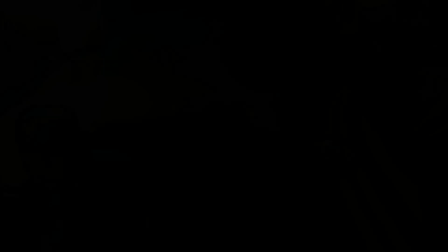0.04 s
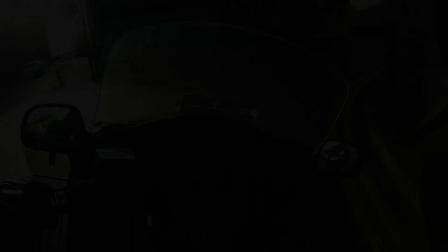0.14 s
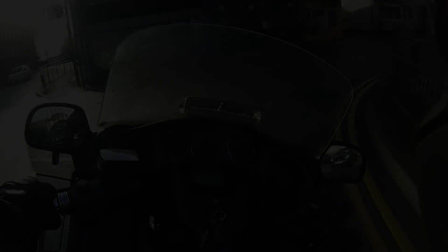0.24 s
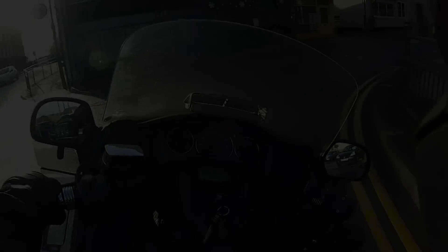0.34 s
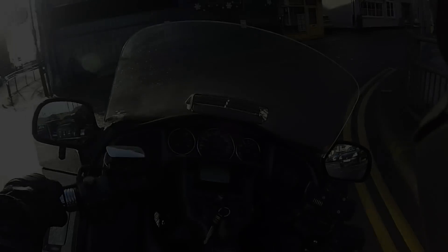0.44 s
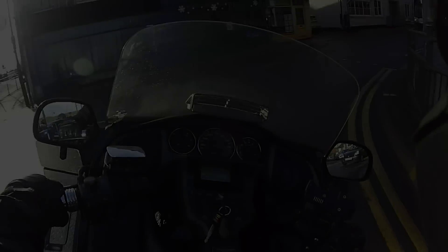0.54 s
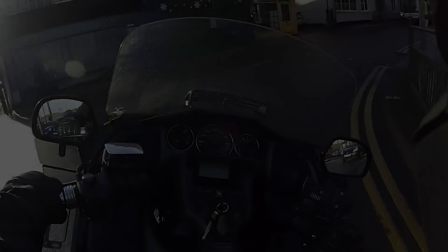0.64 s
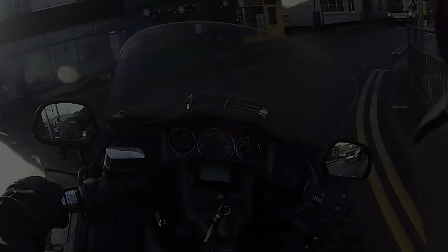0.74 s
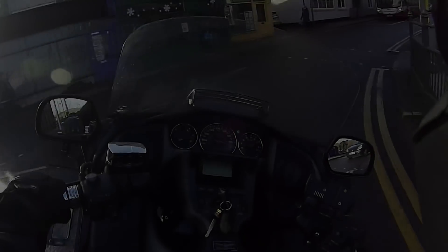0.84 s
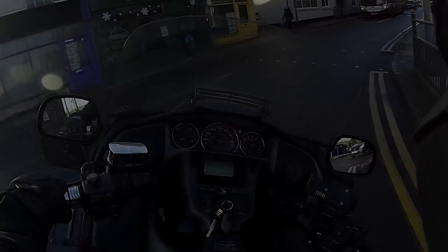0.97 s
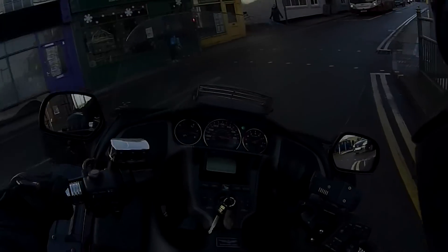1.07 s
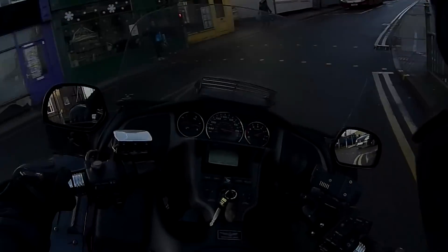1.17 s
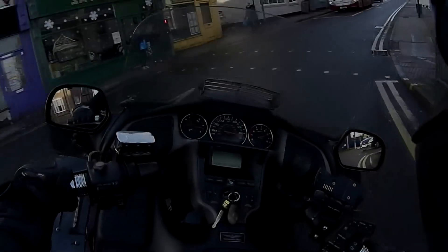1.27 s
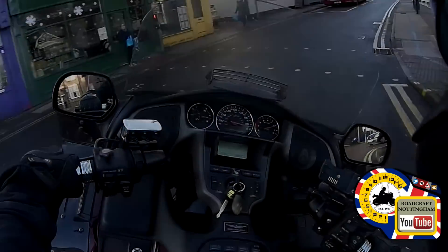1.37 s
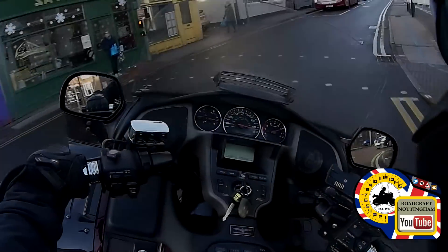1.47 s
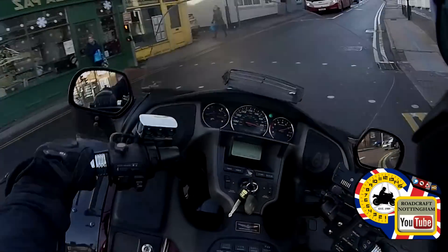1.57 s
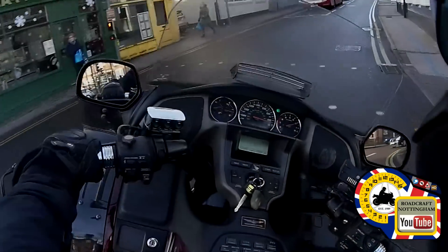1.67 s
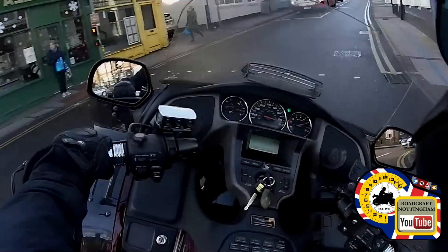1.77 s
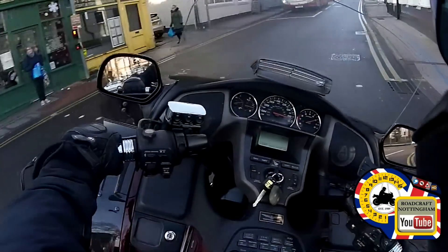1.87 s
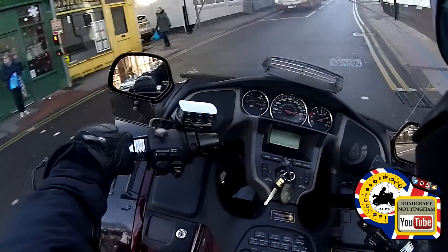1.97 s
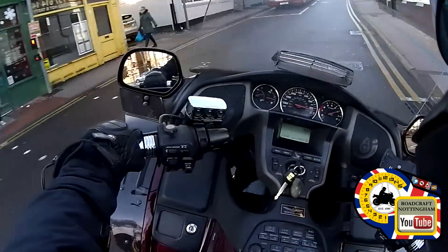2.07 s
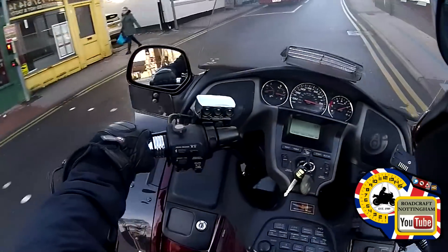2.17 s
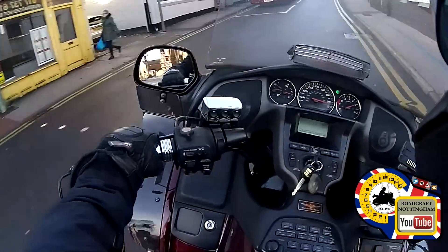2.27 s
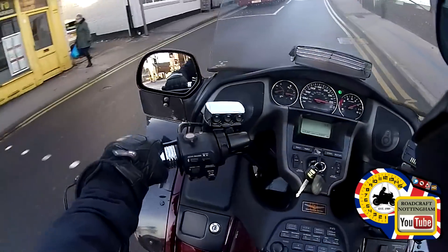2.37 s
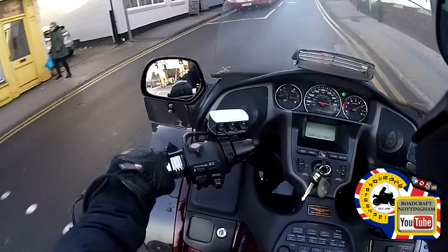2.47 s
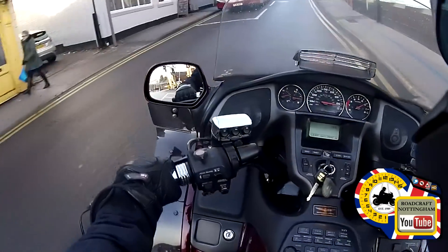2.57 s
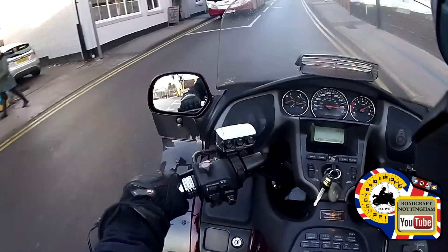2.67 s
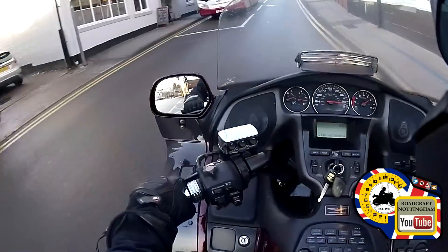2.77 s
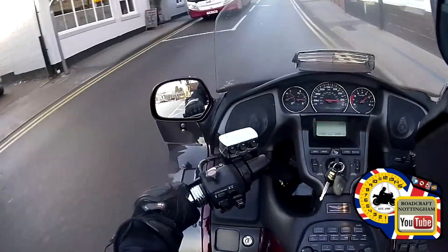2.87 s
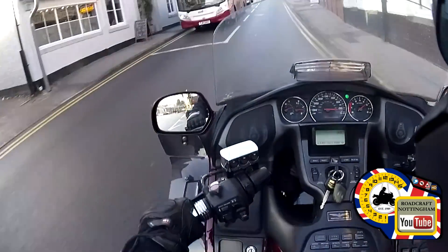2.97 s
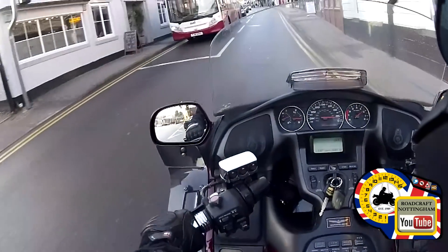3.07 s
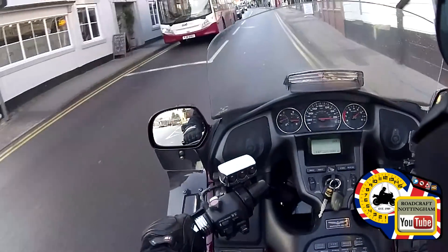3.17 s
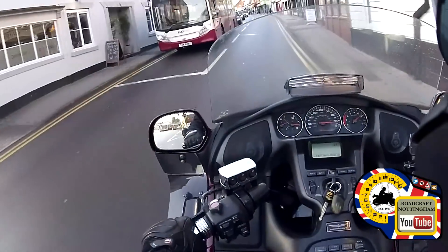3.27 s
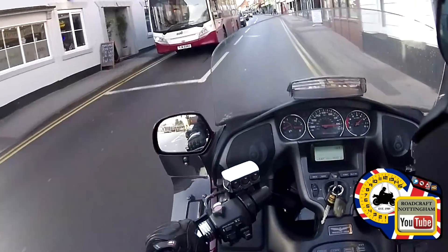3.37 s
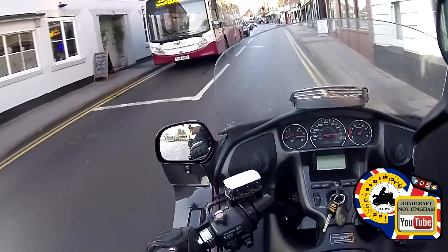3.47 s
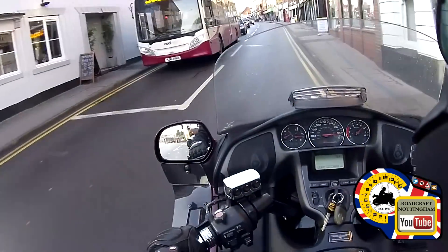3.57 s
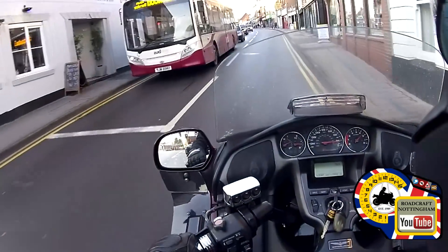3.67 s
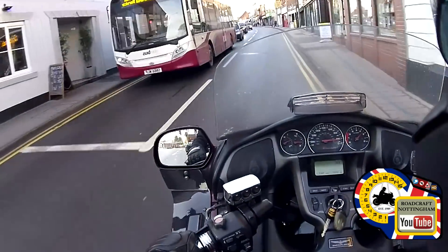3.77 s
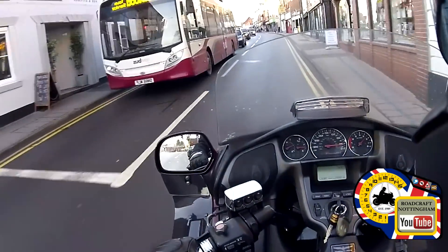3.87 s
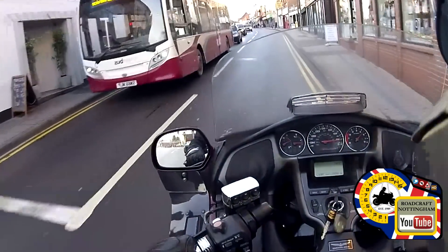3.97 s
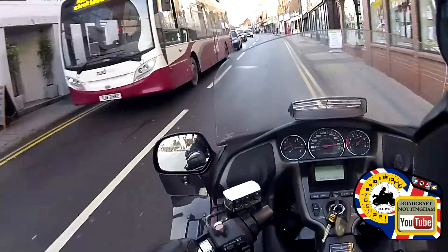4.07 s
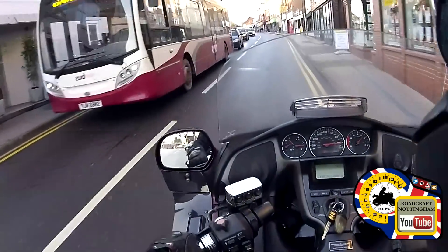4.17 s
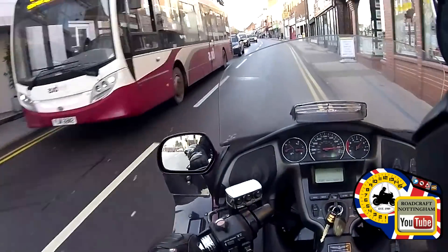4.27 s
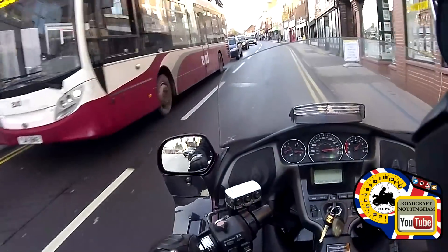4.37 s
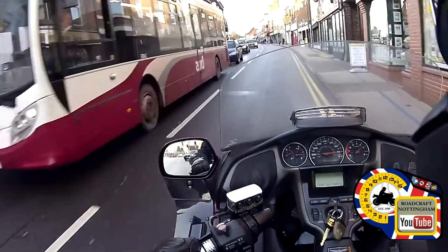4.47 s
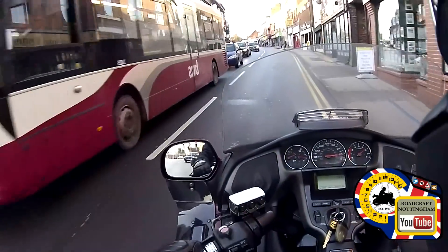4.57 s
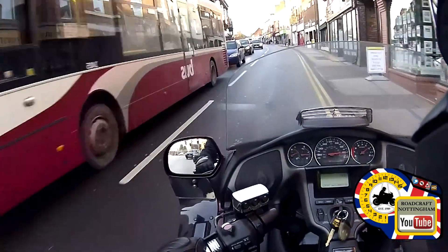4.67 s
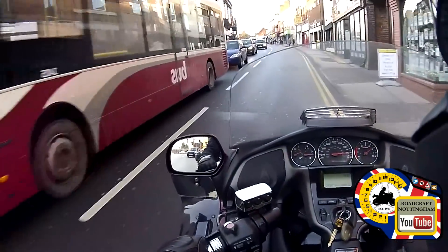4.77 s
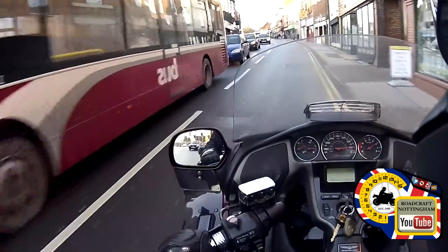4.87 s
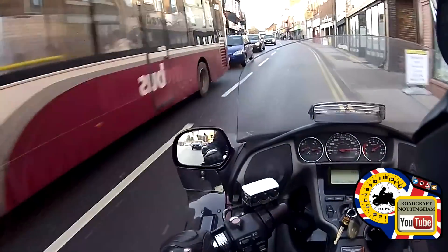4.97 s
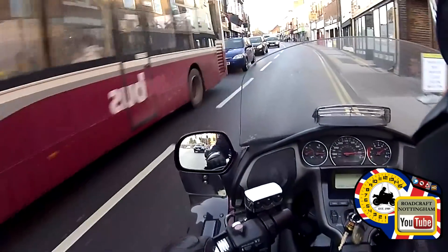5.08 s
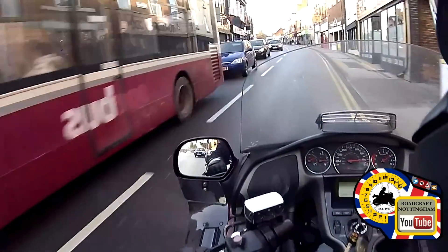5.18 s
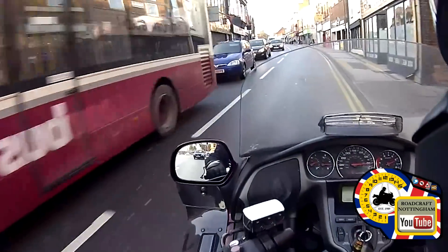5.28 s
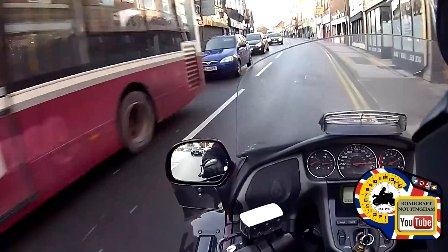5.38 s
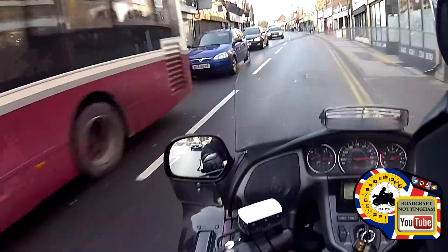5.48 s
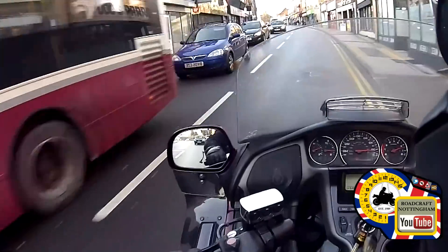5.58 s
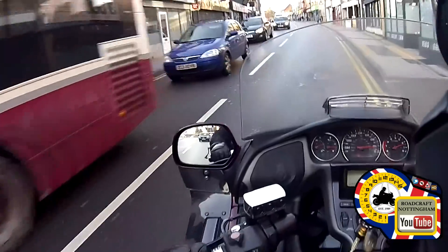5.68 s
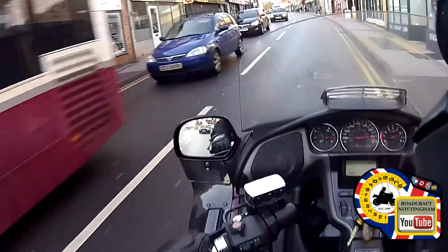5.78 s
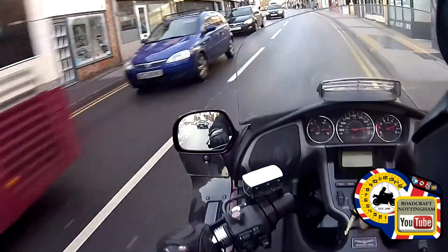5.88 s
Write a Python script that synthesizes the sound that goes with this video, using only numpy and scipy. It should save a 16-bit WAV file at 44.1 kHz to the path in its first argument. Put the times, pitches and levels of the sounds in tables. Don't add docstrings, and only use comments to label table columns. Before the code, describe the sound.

From the saddle, a deep multi-cylinder motorcycle hum climbs for four seconds amid tyre and wind roar, knocks through a shift, and settles lower.

```python
import sys
import numpy as np
from scipy import signal
from scipy.io import wavfile
from scipy.ndimage import uniform_filter1d

SR = 44100
rng = np.random.default_rng(int(sys.argv[2]) if len(sys.argv) > 2 else 0)


def gain_from_db(level_db):
    decades = np.asarray(level_db, float) / 20
    return 10 ** decades


def transcribe(signal):
    frames = np.atleast_2d(signal).T
    limited = np.clip(frames, -1, 1)
    pcm = np.round(limited * 32767).astype(np.int16)
    wavfile.write(sys.argv[1], SR, pcm)


N = 261424

# time in seconds, firings per second.
FIRING_RATE = [(0, 89.8), (.81, 90.2), (1.5, 96.5), (2.3, 106.7), (3.1, 119.4), (3.7, 128.4), (4.07, 134.2),
               (4.12, 125), (4.16, 121.5), (4.2, 113), (4.3, 101.5), (4.38, 98.3), (4.62, 101), (4.73, 100),
               (4.8, 95), (4.94, 78.5), (5.5, 78.8), (5.93, 80.1)]
# time in seconds, firing strength in dB, pulse sharpness as octave lift in dB.
FIRING_STRENGTH = [(0, -2, 0.95), (2.4, 2.2, -2.5), (2.6, 3.8, -1), (4.04, -1.34, 2.7), (4.08, -10.5, 12),
                   (4.17, 1.1, -2), (4.28, -4, -22), (4.32, -4, -13), (4.37, -12, 4), (4.6, -6.5, -1.1),
                   (4.68, -8.5, 3.5), (4.74, -6, 1), (4.92, -9, 1), (5.08, 0, -3), (5.3, -5, 5),
                   (5.65, -4.5, -0.5), (5.8, 0, -10), (5.93, -4.5, 0.1)]
# frequency in Hz, level in dB.
PIPE = [(79, -20.5), (90, -21.5), (101, -19), (116, -16), (134, -11.5), (158, -15.5), (195, -27),
        (230, -36.5)]
UNEVEN_ORDERS = [.75, 1.5, 2.5, 3.5, 4, 4.5, 5, 5.5, 6.5, 7, 7.5, 8.5, 9, 10.5, 11, 12, 13.5, 14, 15, 15.5,
                 16.5, 18.5]
UNEVEN_DB = [-46.5, -51, -47.5, -48.5, -30.5, -35.5, -37, -44.5, -49.5, -46.5, -44, -45, -44.5, -50, -53,
             -45.5, -50, -47.5, -56, -54.5, -49, -52.5]
# frequency in Hz, width in Hz, boost in dB.
FAIRING = [(256, 31, 5), (476.4, 38.7, 12), (690, 50, 3)]
# order per crank turn, level in dB.
MESH = [(73, -4), (74.2, 0), (75, -1), (76, -8)]
# order per crank turn, level in dB.
FLANKS = [(70.5, -4), (71, 0), (72, -4), (77, 0), (78, -3)]
# order per crank turn, level in dB.
MESH_OCTAVE = [(145, -5), (147.5, -5), (148.1, 0), (149.5, -5)]
# order per crank turn, level in dB.
CAMS = [(49, 0), (51, -5)]
# order per turn at road speed, level in dB.
GEARBOX = [(20.08, 1), (22.5, -8), (26.4, -12), (27.8, -9), (30.2, -11)]
# firings in Hz, then mesh, outer sidebands, cam drive, mesh octave in dB.
CASING = [(79, -60.5, -65.5, -69, -61.5), (87.5, -57, -56, -66.5, -64.5), (96.1, -55.5, -56, -61, -71.5),
          (100.7, -51.5, -60.5, -69.5, -73), (114, -56, -62, -63, -76.5), (112.7, -45, -67, -57.5, -78),
          (116.5, -61, -67, -59.5, -78), (131, -55.5, -65.5, -60.5, -78.5)]
# frequency in Hz, density in dB per Hz.
ROAR = [(12, -48), (20, -16.5), (59, -19), (85, -11), (106, -3.5), (135, -0.5), (172, -8.5), (225, -8),
        (365, -12.5), (500, -8), (811, -16), (1030, -24.5), (1850, -35), (2350, -34.5), (6500, -59.5),
        (8450, -95), (14300, -120)]
# frequency in Hz, density in dB per Hz.
HISS = [(1760, -30), (3000, 0), (4030, 0.5), (6370, -11.5), (9600, -3), (13100, -35.5), (13900, -50),
        (15000, -60)]
# frequency in Hz, correlation from 0 to 1.
LIKENESS = [(25, 0.99), (500, 0.995), (1400, .985), (2500, .965), (4500, .9), (7000, 0.9), (10000, .78),
            (12500, .02)]
# time in seconds, roar in dB, hiss in dB, half width in seconds.
PASSING = [
    (.4, 0.4, 1.9, .5),
    (1.3, -2.5, -0.2, 0.37),
    (1.95, 2, -1.9, 0.07),
    (3.75, -0.3, 0.8, .2),
    (4.65, 0, 1, .25),
    (5.4, 1.4, -3, 0.28),
]
# time in seconds, lift in dB, half width in seconds.
GUSTS = [
    (1.3, 4.5, .3),
    (1.9, 5.5, .25),
    (4.2, 5.5, 0.28),
    (5.4, 8, .25),
]
# frequency in Hz, level in dB.
WHISTLES = [(9625, -87.5)]
# time in seconds, peak in dB, scuff in dB, scuff length in seconds.
KNOCKS = [(1.533, -48, -56.5, .015), (1.947, -34.5, -48.5, 0.043), (2.456, -29, -43.5, 0.012),
          (2.564, -27, -45.5, 0.018), (2.587, -32, -52, .015), (3.429, -25, -50, 0.011),
          (4.091, -24.5, -45.5, 0.038), (4.227, -42, -56.5, .015), (4.291, -26.5, -57, 0.033),
          (4.430, -24.5, -44.5, 0.025), (4.438, -25, -50, 0.02), (4.446, -27.5, -51, 0.02),
          (4.598, -40, -56, 0.025), (4.762, -34, -44, .04), (4.887, -27, -50.5, 0.017)]
# frequency in Hz, level in dB, t60 in seconds.
PANEL = [(510, 0.5, 0.037), (530, 1, 0.1), (770, 1, .04), (960, -29, .04)]
# time in seconds, peak in dB, left over right in dB.
TICKS = [(2.3025, -49.5, 7.5), (2.3142, -51, 4.5), (2.5507, -47.5, 5), (2.5652, -47, 7),
         (2.7111, -47.5, 3.5), (2.7413, -45.5, 7), (2.842, -47, 4.5), (2.8864, -56, -3), (2.9813, -50, 1),
         (3.0988, -44, 2), (3.1324, -55.5, 8.5), (3.1311, -44, 0), (3.1491, -46.5, -1.5),
         (3.2232, -56, 1.5), (3.3462, -48.5, 6.5), (3.586, -43.5, -1.5), (3.7507, -48.5, 7.5),
         (3.7772, -52, 1), (3.787, -46.5, 8), (3.796, -44.5, 5), (3.8854, -53.5, 4), (3.9933, -52.5, 6.5),
         (4.165, -43, 5), (4.2884, -51, 5), (5.0774, -48.5, 0), (5.101, -51.5, 4.5), (5.2038, -49, 5)]
# time in seconds, peak in dB, frequency in Hz.
BUMPS = [
    (3.22, -23, 44.5),
    (4.09, -15, 104),
    (4.292, -14, 93.4),
    (4.334, -13.5, 131),
    (4.55, -38, 140),
    (5.701, -13.5, 117),
]
# start in seconds, end in seconds, level in dB, attack in seconds.
DRIVE = [
    (3.415, 4.155, -28.5, 0.28),
    (4.623, 4.975, -29.5, 0.21),
    (4.973, 5.99, -32, 0.036),
]
# time in seconds, level in dB, length in seconds.
CLUTCH_BITE = (4.765, -54.5, .045)

START_S, END_S, SHIFT_S = 0.037, 5.928, 4.07
COAST_SHARE = 0.976
SLIP_SHARE, SLIP_UNTIL_S = 0.125, 1.05
UNEVEN_BASE_DB, UNEVEN_FOLLOWS = -0.5, 0.46
ECHO_FROM_S, ECHO_BEAT_HZ_PER_S, ECHO_SHARE, ECHO_GROWS_S = 2.1, 3.076, 0.16, 0.73
BITE_MESH_DB, BITE_OCTAVE_DB, BITE_WHINE_S = 7.5, 13.5, 0.085
SLOWING_MESH_DB, SLOWING_OCTAVE_DB = -3.5, 7
OCTAVE_FOLLOWS = 1
GEARBOX_DB, GEARBOX_FADES_FROM, GEARBOX_FADE_DB = -41.5, 0.78, -87
ROAR_DB, ROAR_SPEED_POWER, ROAR_FOLLOWS = -29.5, 0.55, 0.32
HISS_DB, HISS_SPEED_POWER, BUFFET_DB = -60, 2.4, -43.5
SELF_NOISE_DB = -84
DRIVE_TOP_HZ, DRIVE_RELEASE_S = 819.7, 0.054


def in_time(rows):
    s, *columns = np.transpose(rows)
    return [np.interp(np.arange(N) / SR, s, column) for column in columns]


def at_hz(points, hz):
    table_hz, values = np.transpose(points)
    return np.interp(np.log(hz), np.log(table_hz), values)


def rms_one(x):
    return x / np.sqrt(np.mean(x ** 2) + 1e-20)


def band(x, order, low_hz, high_hz):
    return signal.sosfilt(signal.butter(order, [low_hz, high_hz], "band", fs=SR, output="sos"), x)


def drift(rate_hz, bend=lambda slow: slow):
    r = np.exp(-80 * np.pi * rate_hz / SR)
    white = rng.standard_normal(N // 40 + 2002)
    slow = signal.lfilter([1], [1, -2 * r, r * r], white)[2000:]
    return np.interp(np.arange(N) / 40, np.arange(len(slow)), bend(rms_one(slow)))


def swell(start_s, length_s):
    age = np.clip(np.arange(N) / SR - start_s, 0, 10 * length_s) / length_s * 3
    return age * np.exp(1 - age)


def hump(rows, column):
    t = np.arange(N) / SR
    return sum(row[column] * np.exp(-((t - row[0]) / row[-1]) ** 2) for row in rows)


def ring(x, hz, t60_s):
    r, w = gain_from_db(-60 / (t60_s * SR)), 2 * np.pi * hz / SR
    return signal.lfilter([0, np.sin(w)], [1, -2 * r * np.cos(w), r * r], x + 1e-18)


def lines(orders, turns, wander_db, rate_hz, blur_rad, boost=lambda order: 1):
    out = 0
    for order, level_db in orders:
        phase = 2 * np.pi * (order * turns + rng.random()) + blur_rad * drift(rate_hz)
        gain = drift(rate_hz, lambda slow: gain_from_db(level_db + wander_db * slow))
        out = out + boost(order) * gain * np.sin(phase)
    return np.sqrt(2) * out


def banded_noise(spectrum, low_hz, count, shared_db, patchy_db):
    out, edges_hz = 0, low_hz * 2 ** (np.arange(count + 1) / 3)
    white = rng.standard_normal((2, 2, N))
    for k, (low, high) in enumerate(zip(edges_hz, edges_hz[1:])):
        mid, side = band(white[k % 2], 2, low, high)
        hz = np.sqrt(low * high)
        alike = np.clip(at_hz(LIKENESS, hz), 0, 1)
        gain = drift(13, lambda slow: gain_from_db(at_hz(spectrum, hz) + patchy_db * slow))
        out = out + gain * (np.sqrt(1 + alike) * mid + np.sqrt(1 - alike) * side * [[1], [-1]])
    return rms_one(out * gain_from_db(shared_db))


def echo_beat():
    t = np.arange(N) / SR
    age = np.clip(t - ECHO_FROM_S, 0, None)
    share = ECHO_SHARE * np.clip(age / ECHO_GROWS_S, 0, 1) * (t < SHIFT_S)
    return np.sqrt(1 + share ** 2 - 2 * share * np.cos(np.pi * ECHO_BEAT_HZ_PER_S * age ** 2))


def exhaust(firings, turns, throttle_db, sharp_db):
    grid_hz = np.arange(2000.)
    lift = gain_from_db(sum(boost_db / (1 + ((grid_hz - hz) / width * 2) ** 4) for hz, width, boost_db in FAIRING))

    def fairing(order):
        return lift[(order * firings / 3).astype(int)]

    tone = lines([(3, 0)], turns, wander_db=0.45, rate_hz=53, blur_rad=0.026)
    tone = tone * echo_beat() * gain_from_db(throttle_db + at_hz(PIPE, firings))
    octave = lines([(6, 0)], turns, wander_db=0.7, rate_hz=4.4, blur_rad=0.029)
    octave = octave * gain_from_db(throttle_db + sharp_db + at_hz(PIPE, 2 * firings))
    uneven = list(zip(UNEVEN_ORDERS, UNEVEN_DB))
    low = lines(uneven[:8], turns, wander_db=2.0, rate_hz=0.53, blur_rad=0.06)
    high = lines(uneven[8:], turns, wander_db=2.5, rate_hz=4.5, blur_rad=0.8, boost=fairing)
    return tone + octave + gain_from_db(UNEVEN_BASE_DB + UNEVEN_FOLLOWS * throttle_db) * (low + high)


def gear_whine(firings, turns, road, effort_db):
    hz, *columns = np.transpose(CASING)
    mesh_db, flanks_db, cams_db, octave_db = [np.interp(firings, hz, column) for column in columns]
    bite = swell(CLUTCH_BITE[0], BITE_WHINE_S)
    slowing = np.clip(uniform_filter1d(-np.gradient(firings) * SR / 100, size=SR // 20), 0, 1.5)
    mesh_db = mesh_db + BITE_MESH_DB * bite + SLOWING_MESH_DB * slowing
    octave_db = octave_db + OCTAVE_FOLLOWS * effort_db + BITE_OCTAVE_DB * bite + SLOWING_OCTAVE_DB * slowing
    gearbox_db = GEARBOX_DB + GEARBOX_FADE_DB * np.clip(road - GEARBOX_FADES_FROM, 0, 1)
    road_turns = np.cumsum(road) * firings.max() / 3 / SR

    mesh = gain_from_db(mesh_db) * rms_one(lines(MESH, turns, wander_db=3.5, rate_hz=7, blur_rad=1.2))
    mesh += gain_from_db(flanks_db) * rms_one(lines(FLANKS, turns, wander_db=3.5, rate_hz=3.1, blur_rad=0.83))
    throb = 1 + 0.2 * np.cos(2 * np.pi * turns)
    cams = gain_from_db(cams_db) * lines(CAMS, turns, wander_db=4.0, rate_hz=2.1, blur_rad=0.44)
    octave = gain_from_db(octave_db) * rms_one(lines(MESH_OCTAVE, turns, wander_db=3.5, rate_hz=14, blur_rad=2.2))
    gearbox = gain_from_db(gearbox_db) * lines(GEARBOX, road_turns, wander_db=3.5, rate_hz=6, blur_rad=1.3)
    return throb * mesh + cams + octave + gearbox


def road_roar(speed_db, effort_db, turns, gusts_db):
    puffs_db = 0.82 * np.cos(6 * np.pi * turns) + 0.69 * np.cos(2 * np.pi * turns)
    level_db = ROAR_DB + ROAR_SPEED_POWER * speed_db + ROAR_FOLLOWS * effort_db + hump(PASSING, column=1)
    return gain_from_db(level_db) * banded_noise(ROAR, 63.57, count=20, shared_db=gusts_db + puffs_db, patchy_db=1.4)


def wind_hiss(speed_db, gusts_db):
    level_db = HISS_DB + HISS_SPEED_POWER * speed_db + hump(PASSING, column=2)
    return gain_from_db(level_db) * banded_noise(HISS, 3805, count=6, shared_db=1.2 * gusts_db, patchy_db=-0.6)


def buffeting(gusts_db):
    level_db = BUFFET_DB + hump(GUSTS, column=1)
    return gain_from_db(level_db) * banded_noise(ROAR, 20, count=5, shared_db=2.0 * gusts_db, patchy_db=0.5)


def camera_noise():
    noise = band(rng.standard_normal((2, N)), 6, 10800, 13300)
    whistle = lines(WHISTLES, np.arange(N) / SR, wander_db=1.5, rate_hz=4, blur_rad=0.3)
    return gain_from_db(SELF_NOISE_DB) * rms_one(noise) + whistle


def knocks():
    scuff = sum(gain_from_db(scuff_db) * swell(s, length_s) for s, _, scuff_db, length_s in KNOCKS)
    scuff = scuff * rms_one(band(rng.standard_normal(N), 2, 600, 2000))
    at = [round(row[0] * SR) for row in KNOCKS]
    peaks_db = np.array(KNOCKS)[:, 1]
    body = 0
    for hz, level_db, t60_s in PANEL:
        blows = np.zeros(N)
        blows[at] = gain_from_db(peaks_db + level_db - 0.5 + rng.normal(0, 1.3, len(KNOCKS)))
        body = body + ring(blows, hz, t60_s)
    return signal.sosfilt(signal.butter(4, 850, fs=SR, output="sos"), body) + scuff


def ticks():
    out = np.zeros((2, N + 200))
    decay = np.exp(-np.arange(200) / SR / 0.00091)
    for s, peak_db, pan_db in TICKS:
        at = round(s * SR)
        grain = rng.standard_normal((2, 200))
        gain = gain_from_db(peak_db + 4.5 + pan_db * np.array([[0.5], [-0.5]]))
        out[:, at:at + 200] += gain * (grain + 0.16 * grain[0]) * decay
    return band(out[:, :N], 2, 2800, 11500)


def bumps():
    out, t = np.zeros(N), np.arange(N) / SR
    for s, peak_db, hz in BUMPS:
        age = np.clip(t - s, 0, None) / 0.005
        out += gain_from_db(peak_db) * age * np.exp(1 - age) * np.sin(2 * np.pi * hz * (t - s))
    return out


def final_drive(road):
    t = np.arange(N) / SR
    loaded = 0
    for start_s, end_s, level_db, attack_s in DRIVE:
        rise = np.clip((t - start_s) / attack_s, 0, 1) ** 2
        fall = (end_s - t) / DRIVE_RELEASE_S
        loaded = loaded + gain_from_db(level_db) * np.clip(np.minimum(rise, fall), 0, 1)
    turns = np.cumsum(DRIVE_TOP_HZ * road) / SR
    return loaded * lines([(1, 0.1)], turns, wander_db=1.53, rate_hz=19, blur_rad=0.35)


def clutch_bite():
    start_s, level_db, length_s = CLUTCH_BITE
    rasp = band(rng.standard_normal(N), 1, 1500, 4500)
    return gain_from_db(level_db) * swell(start_s, length_s) * rms_one(rasp)


def scene():
    t = np.arange(N) / SR
    firings, = in_time(FIRING_RATE)
    throttle_db, sharp_db = in_time(FIRING_STRENGTH)
    turns = np.cumsum(firings) / 3 / SR
    effort_db = uniform_filter1d(throttle_db, size=SR // 4)
    top = firings.max()
    road = np.where(t < SHIFT_S, firings, np.maximum(firings, COAST_SHARE * top)) / top
    road = road * (1 - SLIP_SHARE * np.clip(1 - t / SLIP_UNTIL_S, 0, 1))
    speed_db = 20 * np.log10(road)
    gusts_db = 0.39 * drift(0.65) + 0.27 * drift(19.0)

    engine = exhaust(firings, turns, throttle_db, sharp_db) + gear_whine(firings, turns, road, effort_db)
    air = road_roar(speed_db, effort_db, turns, gusts_db) + wind_hiss(speed_db, gusts_db) + buffeting(gusts_db)
    bike = engine + knocks() + bumps() + final_drive(road) + clutch_bite()
    return bike + air + ticks()


def roll_off(x):
    return signal.sosfilt(signal.butter(12, 15120, fs=SR, output="sos"), x)


def record(dry):
    t = np.arange(N) / SR
    opening = np.clip(np.minimum(t - START_S, END_S - t) / 0.002, 0, 1)
    middle = band(dry, 1, 900, 5000)
    ports = dry * gain_from_db(np.array([[0.7], [-0.7]])) + 0.025 * middle * [[-1], [1]] + camera_noise()
    return roll_off(ports * opening)


dry = scene()
out = record(dry)
transcribe(out)
```